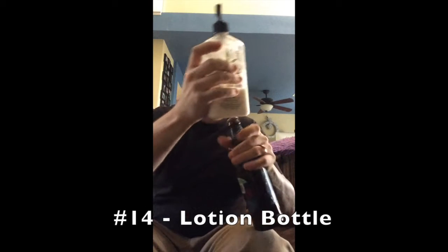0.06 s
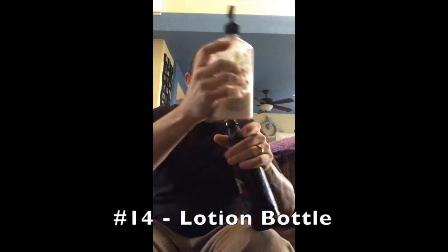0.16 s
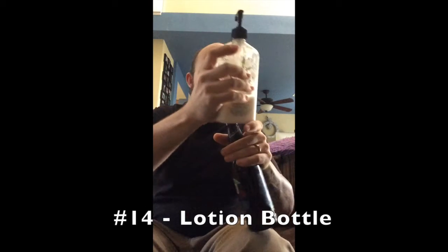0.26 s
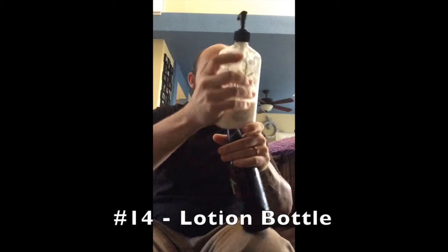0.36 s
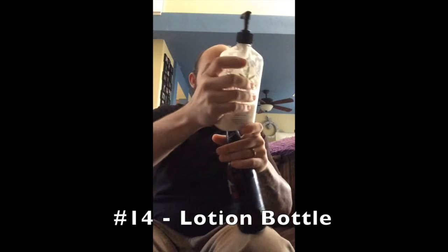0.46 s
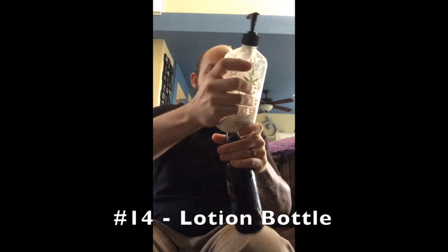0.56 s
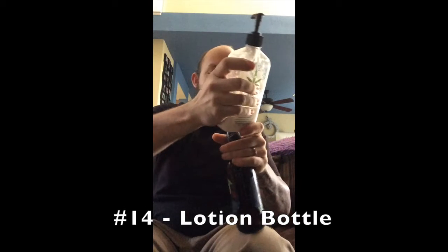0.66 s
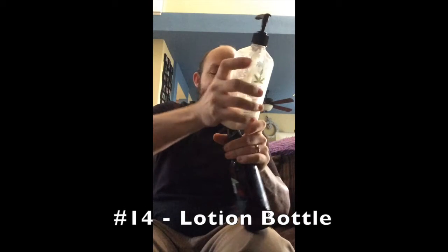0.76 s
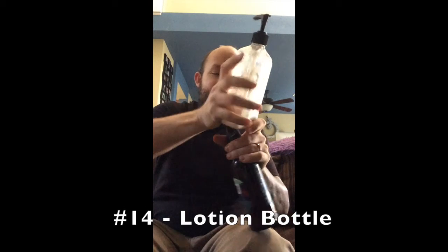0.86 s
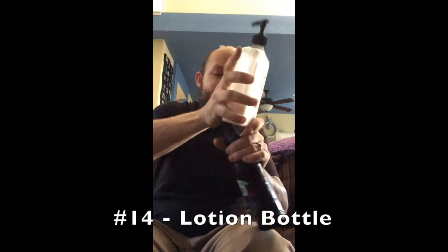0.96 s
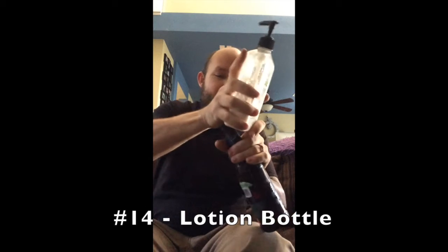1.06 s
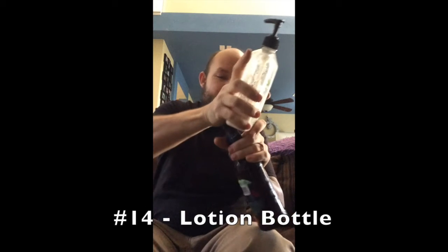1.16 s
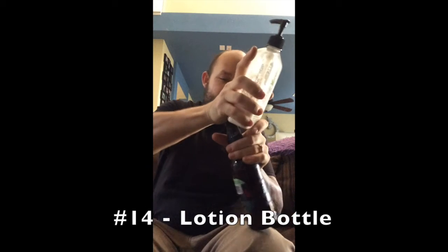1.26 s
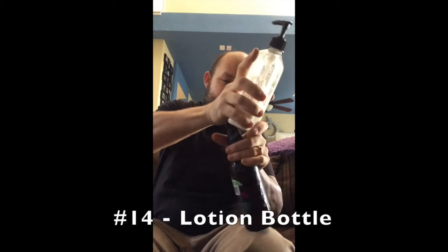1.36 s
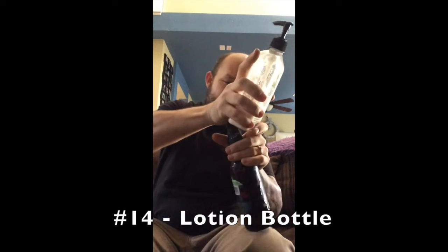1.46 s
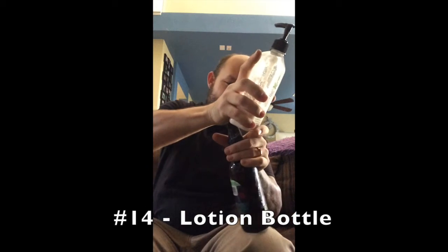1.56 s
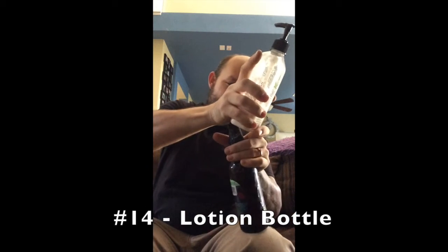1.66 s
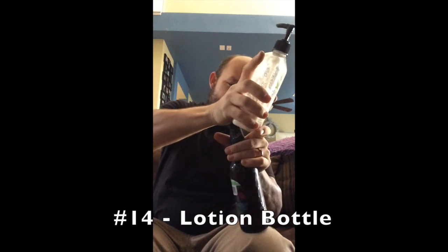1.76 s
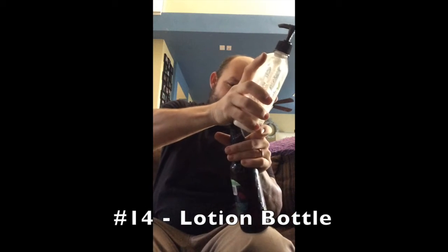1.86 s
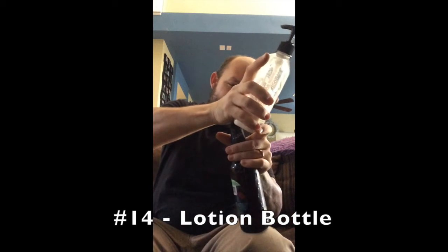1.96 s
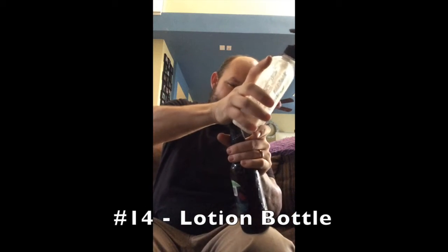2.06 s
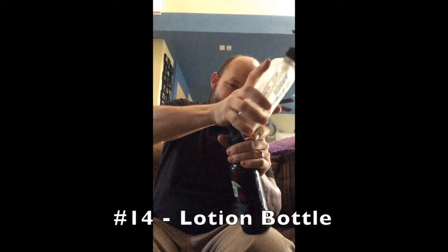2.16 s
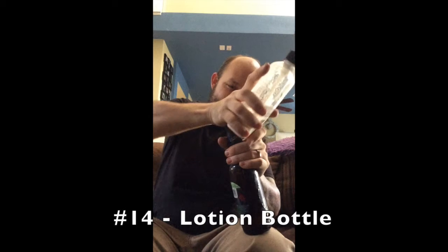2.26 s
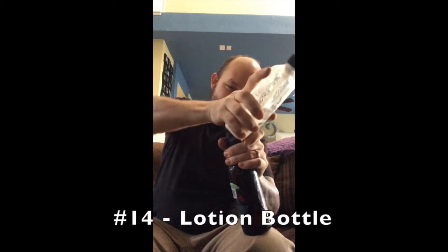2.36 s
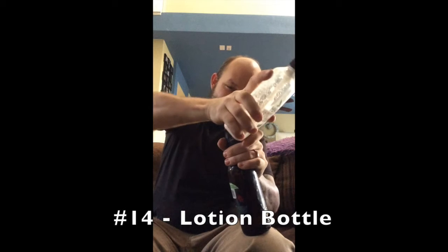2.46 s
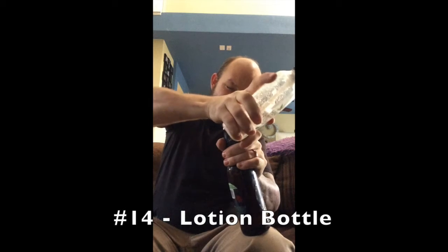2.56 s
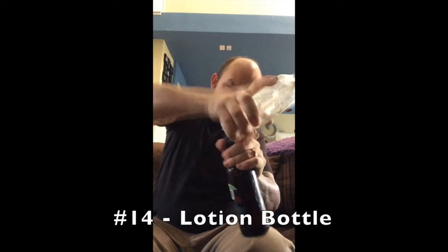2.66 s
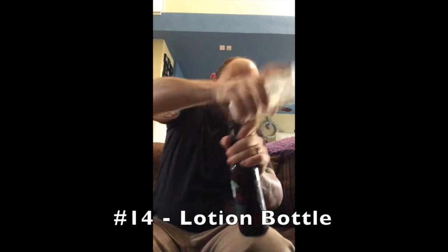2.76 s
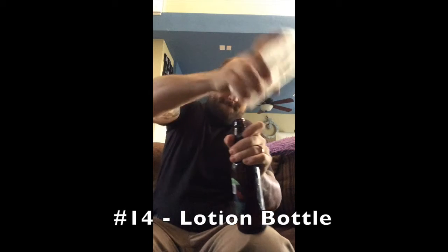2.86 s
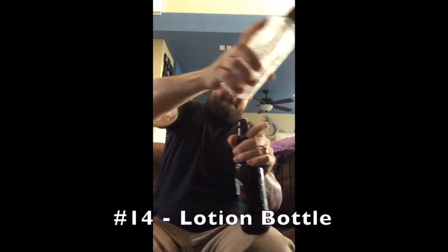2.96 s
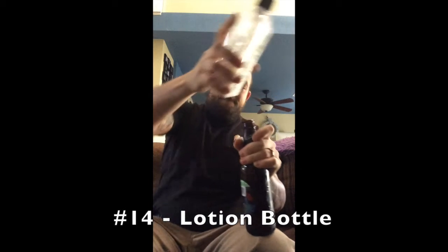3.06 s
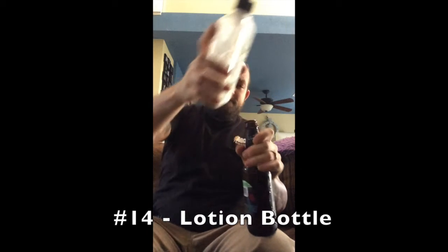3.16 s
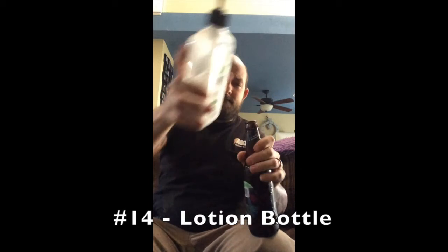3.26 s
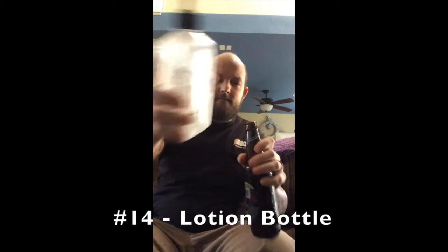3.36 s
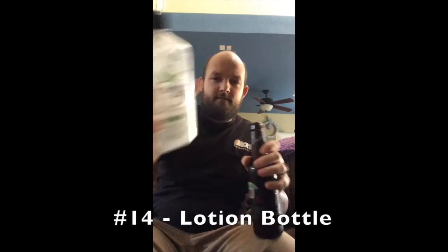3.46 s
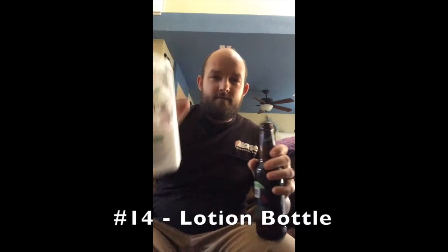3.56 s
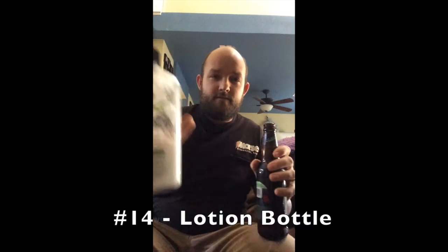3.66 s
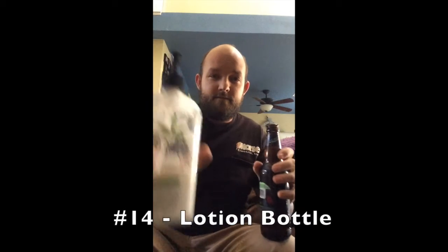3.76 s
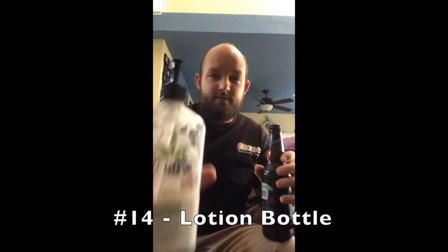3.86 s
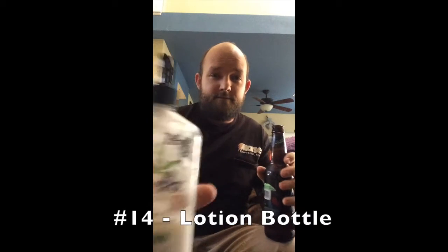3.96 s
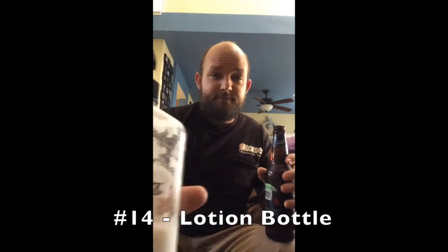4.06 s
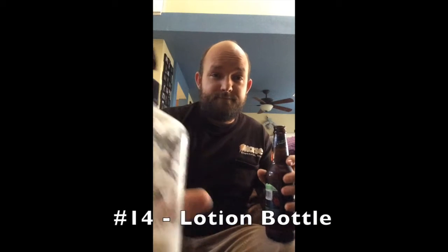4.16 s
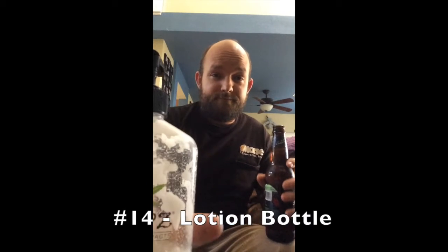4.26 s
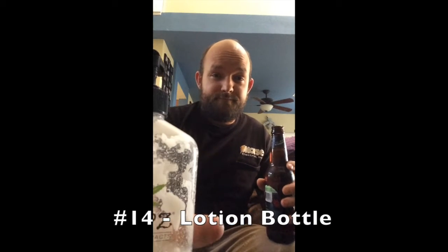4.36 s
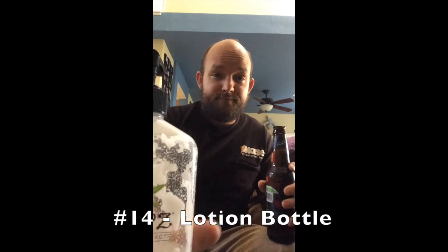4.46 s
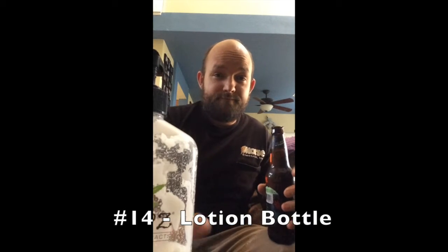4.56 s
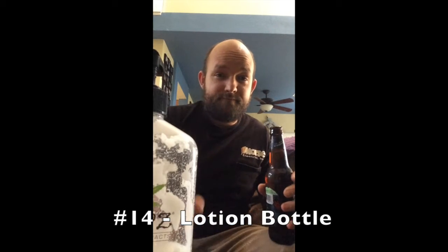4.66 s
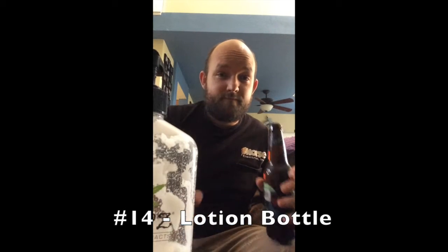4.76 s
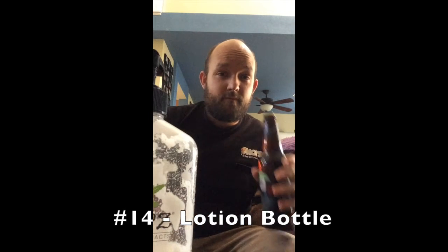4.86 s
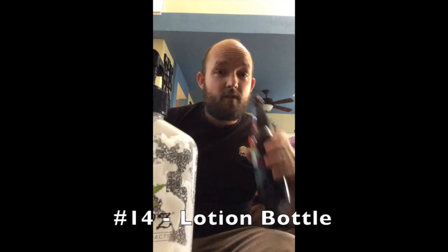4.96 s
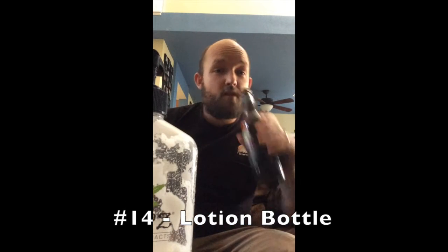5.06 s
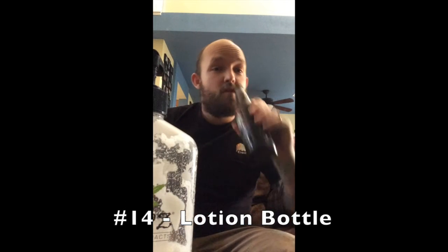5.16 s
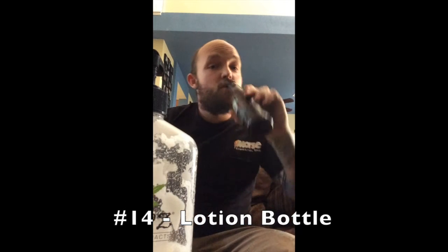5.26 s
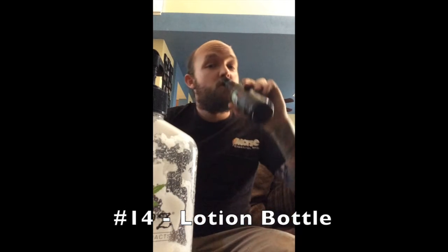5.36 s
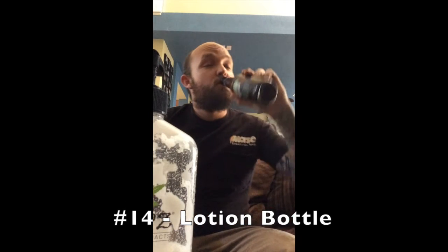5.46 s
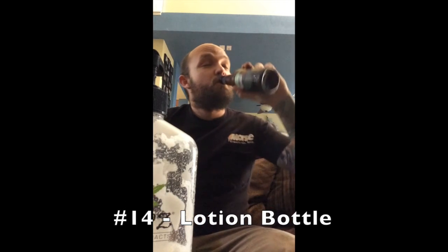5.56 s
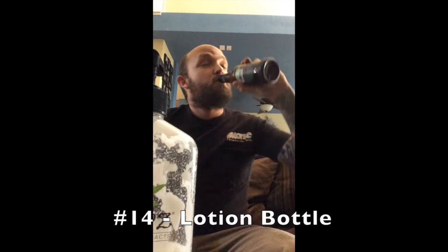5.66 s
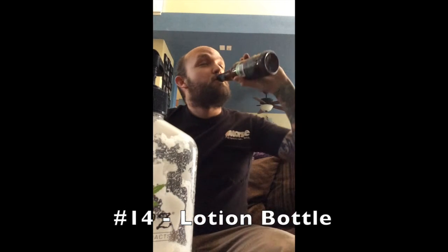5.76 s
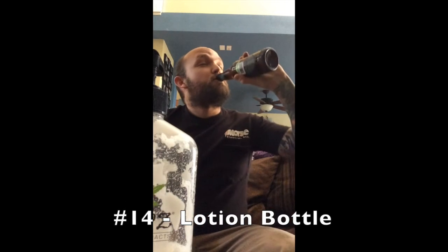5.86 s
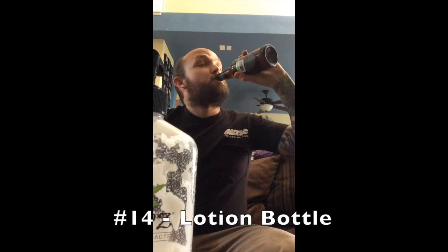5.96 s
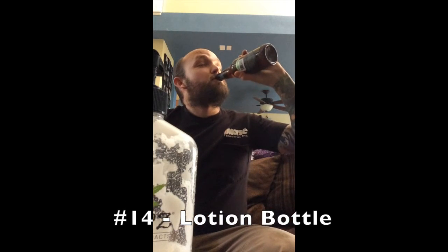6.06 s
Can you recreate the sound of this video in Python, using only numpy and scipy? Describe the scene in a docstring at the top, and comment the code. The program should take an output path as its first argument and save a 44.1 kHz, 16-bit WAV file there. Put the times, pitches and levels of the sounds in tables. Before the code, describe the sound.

In a quiet living room, plastic clacks against a glass bottle, gas spits, the cap snaps off with a hollow ring, and a plastic bottle thuds down.

```python
"""A hard clack, a short hiss of gas, a snap and a ringing neck tone, then a knock, over rustle and room air.
A crown cap is levered off a glass beer bottle with the edge of a plastic lotion bottle in a quiet living
room; the lotion bottle is then knocked down on a table while hands and shirt rustle, with small ticks.
Solid bodies are sums of damped modes, their contacts scattered impulses; gas, friction and air are
filtered noise. Reflections and a diffuse tail place every source but the rubbing and the air in the room."""
import sys
import numpy as np
from scipy import signal
from scipy.fft import rfft, irfft, next_fast_len
from scipy.io import wavfile

SR = 44100
rng = np.random.default_rng(int(sys.argv[2]) if len(sys.argv) > 2 else 0)


def log_audio(samples):
    """Write samples as a 16-bit WAV file to the path given in sys.argv[1]."""
    # one column per channel
    frames = np.atleast_2d(samples).T
    # limit to full scale, then quantise
    limited = np.clip(frames, -1, 1)
    pcm = np.round(limited * 32767).astype(np.int16)
    wavfile.write(sys.argv[1], SR, pcm)


N = 270091  # length in samples

POP_S = 2.7056  # the cap comes free
# air in the opened bottle: pitch_hz, level_db, t60_s
NECK_MODES = [(830, -6.2, .082)]


def amp(db):
    """Gain is ten to the power of a twentieth of the level in dB."""
    return 10 ** (np.asarray(db) / 20)


def unit(x):
    """Normalisation: x scaled to rms 1."""
    return x / np.sqrt(np.mean(x ** 2) + 1e-20)


def along(points, hz):
    """Interpolation of (Hz, value) points on a logarithmic frequency axis."""
    f, v = np.transpose(points)
    return np.interp(np.log(hz + 1), np.log(f + 1), v)


def filtered(x, response):
    """Linear filtering: the spectrum of x times a response of frequency."""
    m = next_fast_len(len(x) + SR // 2)
    spectrum = rfft(x, m) * response(np.fft.rfftfreq(m, 1 / SR))
    return irfft(spectrum, m)[:len(x)]


def resonance(f, hz, width):
    """Response of one damped resonator: unity at its natural frequency, falling off to both sides."""
    return 1j * f * width / (hz * hz - f * f + 1j * f * width)


def causal(gain):
    """Minimum phase: the response with this gain that answers as promptly as physics allows."""
    cepstrum = irfft(np.log(abs(gain) + 1e-6))
    half = len(cepstrum) // 2
    folded = np.r_[cepstrum[0], 2 * cepstrum[1:half]]
    return np.exp(rfft(folded, len(cepstrum)))


def noise(response, size=N):
    """Coloured noise: white noise through a filter, at rms 1."""
    return unit(filtered(rng.standard_normal(size), response))


def fade(t60, attack):
    """Exponential damping over one second: 60 dB in t60, after a rise of time constant attack."""
    t = np.arange(SR) / SR
    return np.exp(-np.log(1000) * t / t60) * (1 - np.exp(-t / attack))


def ring(modes, attack, blur=0):
    """Modal vibration: damped modes set off together; blur (radians) is a tumbling body's phase flutter."""
    t = np.arange(SR) / SR

    def flutter():
        if not blur:
            return 0
        return blur * (1 - np.exp(-t / .02)) * noise(lambda f: f < 45, size=SR)

    return sum(amp(db) * np.sin(2 * np.pi * hz * t + flutter()) * fade(t60, attack)
               for hz, db, t60 in modes)


def burst(response, decay_s):
    """Rough contact: a coloured impulse scattered in time; decay_s sets both its energy and its spread."""
    decay = fade(decay_s, attack=.0001)
    phase = np.angle(rfft(rng.standard_normal(SR) * decay, 2 * SR))
    # flat spectrum with random phase, faded by 15 dB in decay_s
    scatter = irfft(np.exp(1j * phase))[:SR] * decay ** .25
    colour = causal(response(np.fft.rfftfreq(2 * SR, 1 / SR)))
    x = irfft(rfft(scatter, 2 * SR) * colour)[:SR]
    return x * np.linalg.norm(decay) / np.linalg.norm(x)


def at(s, x):
    """Time shift: x placed at s seconds."""
    return np.pad(x, (round(s * SR), N))[:N]


def room(x, wet_db, wall_db, build=0.0062, wall_s=.0275):
    """Reverberation: direct sound, one wall's reflection, and a diffuse tail that builds up and dies by band."""
    # decay of the room: band_hz, t60_s
    band_decay = [(100, 0.36), (400, 0.39), (1000, .36), (4000, .38), (8000, .35), (15000, 0.27)]
    hz, t, z = signal.stft(rng.standard_normal(SR), SR, nperseg=256)
    damping = np.exp(-np.log(1000) * t / along(band_decay, hz)[:, None])
    tail = signal.istft(z * damping, SR, nperseg=256)[1]
    tail = tail * (1 - np.exp(-np.arange(len(tail)) / SR / build))
    diffuse = signal.fftconvolve(x, tail / np.linalg.norm(tail))[:N]
    return x + amp(wall_db) * at(wall_s, x) + amp(wet_db) * diffuse


def background():
    """Broadband and narrow-band noise: steady room air and a narrow, wavering ventilation drone."""
    # room air spectrum, relative per Hz: freq_hz, level_db
    air_spectrum = [(15, -48.5), (25, -28), (42, -14.5), (66, -6.5), (110, -12), (190, -8.5), (300, -12.5),
                    (550, -16), (1020, -25), (1450, -22), (2220, -30.5), (4500, -40.5), (7000, -47),
                    (15400, -58)]
    # drone bands, each resonator applied twice: centre_hz, resonator_width_hz, level_db
    drone_bands = [(179.5, 8.5, -66), (263.5, 50, -70.5)]
    drone = sum(amp(db) * noise(lambda f: resonance(f, hz, width) ** 2) for hz, width, db in drone_bands)
    return amp(-61.5) * noise(lambda f: amp(along(air_spectrum, f))) + drone


def stroke(start, length):
    """Hand kinematics: speed over half a sine as the hand sets off, glides and stops, 0-1."""
    return np.sin(np.pi * np.clip((np.arange(N) / SR - start) / length, 0, 1))


def handling():
    """Granular friction: skin and cloth rub louder as the hand moves faster; grip and arm bump dully."""
    # hands sliding on the bottles, shirt moving: start_s, length_s, level_db
    slides = [(0.082, 0.1, -72), (0.717, .11, -68), (0.804, .25, -66), (1.36, .08, -78), (2.076, 0.14, -70),
              (3.278, 0.36, -77.5), (3.66, 0.33, -75.5), (4.435, 0.13, -72.5), (4.619, 0.2, -71.5),
              (4.779, 0.36, -72.5)]
    # rubbing spectrum, relative per Hz: freq_hz, level_db
    cloth_spectrum = [(300, -9), (1000, 3), (2500, 2.5), (4500, -3.5), (7500, 1), (10000, -5),
                      (15000, -6.5)]
    # soft bumps of the grip and of the arm: start_s, level_db, relative_skin_noise_db
    soft_bumps = [(.459, -49, -17), (0.989, -47.5, -8), (3.48, -45.5, -27)]
    rub_power = 0.91  # loudness against hand speed
    grip_db, grip_end_s = -84, 5.15  # faint rubbing while the hands work

    grain = unit(amp(2 * noise(lambda f: f < 250)))
    grip = amp(grip_db) * (np.arange(N) / SR < grip_end_s)
    sliding = sum(amp(db) * stroke(s, length) ** rub_power for s, length, db in slides)
    friction = np.hypot(grip, sliding)
    rub = friction * grain * noise(lambda f: amp(along(cloth_spectrum, f)))

    thump = lambda: burst(lambda f: resonance(f, 128, 103) ** 2, decay_s=0.075)
    skin = lambda: burst(lambda f: resonance(f, 810, 1000), decay_s=0.1)
    bumps = sum(at(s, amp(db) * (thump() + amp(skin_db) * skin())) for s, db, skin_db in soft_bumps)
    return rub + bumps


def ticks():
    """Impact of small hard bodies: a click and one short ring; the higher the ring, the sooner it dies."""
    # cap, fingers and glass: start_s, level_db, ring_hz, relative_click_db
    taps = [(0.1188, -41, 9060, 0.5), (1.058, -59.5, 5770, 4.5), (1.094, -58, 8540, 4.5),
            (2.2906, -61, 3300, 9), (2.4417, -62, 13000, 2), (3.0201, -47, 9000, 4),
            (3.2686, -44.5, 3440, -10.5), (3.29, -56, 1720, -5), (3.3882, -58, 2140, 7),
            (4.17, -61, 2424, -1), (4.978, -43, 6300, 1), (5.0864, -65, 4060, 6)]
    ring_cycles = 83  # the ring decays by 60 dB in this many cycles
    click = lambda hz: burst(lambda f: resonance(f, hz, 7400) ** 2, decay_s=0.0078)

    def tap(hz, click_db):
        tone = ring([(hz, 0, ring_cycles / hz)], attack=0.00013)
        return tone + amp(click_db) * click(hz)

    train = sum(at(s, amp(db) * tap(hz, click_db)) for s, db, hz, click_db in taps)
    return room(train, wet_db=-14.5, wall_db=-23)


def clacks():
    """Impact excitation of damped modes: the plastic edge grazes the rim, then seats under the cap."""
    # plastic edge meeting the glass neck: start_s, level_db
    strikes = [(.2388, -20.5), (.3425, -46.5), (0.456, -49.5)]
    # the two bottles pressed together, damped by the hands: pitch_hz, relative_level_db, t60_s
    bottle_modes = [(171, -18.5, 0.15), (451, -6, 0.07), (490, -12.5, 0.047), (1940, -18, 0.056),
                    (3286, -15, 0.046), (3500, -41, 0.19), (3600, -28, 0.038), (3540, -42.5, 0.5),
                    (6730, -32, .02), (6780, -31, .016)]
    # the plastic's knock, relative per Hz: freq_hz, level_db
    edge_spectrum = [(100, -10), (300, -28), (480, 7.5), (640, 0.5), (900, 0.5), (1200, -14), (1450, -7.5),
                     (1900, -4.5), (2900, -25), (4200, -23), (5500, -47), (7000, -39), (15000, -47)]
    contact = lambda: amp(5.5) * burst(lambda f: amp(along(edge_spectrum, f)), decay_s=0.0078)
    body = lambda: ring(bottle_modes, attack=.0006, blur=1.1)
    blows = sum(at(s, amp(db) * (body() + contact())) for s, db in strikes)
    scrape = burst(lambda f: resonance(f, 1800, 2300) ** 2, decay_s=0.15)
    graze = at(.2315, amp(-53) * scrape)
    return room(blows + graze, wet_db=-17.5, wall_db=-26)


def hiss():
    """Turbulent jet noise: gas escapes under the lifted rim; a wider slit adds the low part."""
    # jet spectrum before the slit, relative per Hz: freq_hz, level_db
    gas_spectrum = [(350, -58.5), (600, -26), (787, -15.5), (854, -14), (1800, -4.5), (2150, -4.5),
                    (2570, -17.5), (3410, -4.5), (4420, -9.5), (7710, -3), (8950, -11.5), (10100, -2.5),
                    (11000, -5.5), (13600, -1.5), (15400, -7.5)]
    # resonances of the gap, each resonator applied twice: pitch_hz, resonator_width_hz, gain_db
    gap_modes = [(1830, 1200, -5.5), (7600, 1200, 0), (9920, 520, -3), (13700, 850, -4)]
    leak_s, leak_db = 2.512, -35.5
    open_s, hold_s, close_s = .065, 0.028, .034  # the slit opens, stays open, closes as pressure drops
    flow_power = 1.2  # flow grows faster than the width of the slit

    def slit(f):
        return amp(1.0) + sum(amp(db) * abs(resonance(f, hz, width)) ** 2 for hz, width, db in gap_modes)

    jet = noise(lambda f: amp(along(gas_spectrum, f)) * slit(f))
    low = filtered(jet, lambda f: 1 / (1 + (f / 3500) ** 2) ** 2)
    corners_s = np.cumsum([leak_s, open_s, hold_s, close_s])
    slit_width = np.interp(np.arange(N) / SR, corners_s, [0, 1, 1, 0])
    flow = slit_width ** flow_power
    gas = amp(leak_db) * flow * (jet - (1 - np.sqrt(flow)) * low)
    return room(gas, wet_db=-18.5, wall_db=-32.0)


def echoes(count):
    """Repeated reflection: the neck tone lingers and swells back on each round trip between two walls."""
    trip_s, echo_db, trip_loss_db = .11, -30.5, 13  # each round trip is weaker by the loss
    echo_rise_s, echo_t60_s = 0.0043, 0.16
    linger_db, linger_t60_s = -42, .68  # the same tone, diffuse in the room
    swell = at(POP_S, amp(linger_db) * fade(linger_t60_s, attack=.02))
    for k in range(count):
        echo = amp(echo_db - k * trip_loss_db) * fade(echo_t60_s, echo_rise_s)
        swell = swell + at(POP_S + (k + 1) * trip_s, echo)
    wander = 0.5 * noise(lambda f: f < 40)  # radians
    return swell * np.sin(2 * np.pi * NECK_MODES[0][0] * np.arange(N) / SR + wander)


def pop():
    """Sudden release: the crimps let go, the cap rings and tumbles, and the pressure sounds the neck."""
    # crimps scraping and snapping over the glass lip: start_s, level_db, decay_s (as in burst)
    crimp_snaps = [(2.6925, -47.5, 0.24), (2.7028, -29, 0.03), (2.705, -13.5, 0.02),
                   (2.7069, -12.5, 0.0074)]
    # colour of a snap, relative per Hz: freq_hz, level_db
    snap_spectrum = [(40, -26), (90, 2), (200, -5), (560, -2.5), (830, -4), (1200, 3.5), (1800, -1),
                     (2700, -10), (3800, -6.5), (4400, -14), (5200, -8), (7700, -9.5), (15000, -21.5)]
    # glass body and held plastic, jolted by the release: pitch_hz, level_db, t60_s
    jolt_modes = [(80, -29, 0.035), (128, -35, 0.056), (258, -28, 0.057), (308, -30.5, 0.053),
                  (430, -23, 0.018), (570, -14, .018), (576, -27, 0.066), (1150, -27.5, .025),
                  (1294, -28, .03), (1666, -35, 0.13)]
    # the steel cap as it flies off: pitch_hz, level_db, t60_s
    cap_modes = [(3460, -22, .028), (3470, -50, .52), (3600, -52, .45), (3820, -31, .02), (5088, -18, .019),
                 (5110, -46, .42), (5245, -17, .021), (5290, -46, .42), (6540, -55, .25), (7845, -29, .02),
                 (7856, -58, .3)]

    snaps = sum(at(s, amp(db) * burst(lambda f: amp(along(snap_spectrum, f)), decay_s))
                for s, db, decay_s in crimp_snaps)
    jolt = at(POP_S, ring(jolt_modes, attack=0.0013))
    steel = at(POP_S, ring(cap_modes, attack=.0008, blur=2))
    # the air column starts once the mouth is open
    air = at(POP_S + .0011, ring(NECK_MODES, attack=.002))
    return (room(snaps, wet_db=-15, wall_db=-20.0)
            + room(jolt, wet_db=-7, wall_db=-14.5)
            + room(steel, wet_db=-15.0, wall_db=-14.0)
            + room(air, wet_db=-21.5, wall_db=-31.0)
            + echoes(count=4))


def knock():
    """Impact on a plate: the lotion bottle lands on its rim, then flat, and the table top's modes boom."""
    # rim, then flat of the base, touching down and rocking:
    # start_s, level_db, decay_s (as in burst), dulling_hz
    landings = [(4.268, -38, 0.058, 150.4), (4.2747, -25, 0.011, 8980), (4.2777, -8.5, 0.0074, 2310),
                (4.289, -31.5, 0.036, 1300), (4.3145, -29, 0.062, 497), (4.329, -31, 0.056, 350)]
    # colour of a contact before dulling, relative per Hz: freq_hz, level_db
    thud_spectrum = [(50, -13), (110, 3), (200, -3.5), (500, 10.5), (850, -3.5), (1300, 2), (2000, 1.5),
                     (3000, -11), (5000, -11.5), (9000, -17), (13800, -17), (15000, -27)]
    # table top under the lotion bottle: pitch_hz, level_db, t60_s
    table_modes = [(78.9, -18, 0.025), (133.8, -22, 0.3), (160, -34, 0.16), (262, -32, 0.34),
                   (293.7, -29.5, 0.27), (339, -19, 0.17), (397.7, -12.5, 0.048), (447, -13.5, .03),
                   (481.2, -3, 0.033), (567, -29, 0.12), (616.6, -36, 0.27), (751, -35.5, 0.21),
                   (1008, -35, 0.12), (1037, -43, 0.38), (1711, -45, 0.23), (2230, -42.5, .18)]
    knock_s = 4.2762  # the table top starts to sound

    def base(dull_hz):
        return lambda f: amp(along(thud_spectrum, f)) / np.hypot(1, f / dull_hz)

    contacts = sum(at(s, amp(db) * burst(base(dull_hz), decay_s)) for s, db, decay_s, dull_hz in landings)
    boom = at(knock_s, ring(table_modes, attack=0.0018))
    return room(contacts, wet_db=-9.5, wall_db=-23, build=0.0018) + room(boom, wet_db=-25.5, wall_db=-14.5)


def scene():
    """Superposition: all sources add at one microphone."""
    return (background() + handling() + ticks() + clacks() + hiss() + pop() + knock())[None]


def record(dry):
    """Band limiting: the microphone sheds the deepest bass and cuts steeply above its band limit."""
    top_hz = 15350
    bass = lambda f: -f * f / (42 ** 2 - f * f + 55j * f)
    treble = lambda f: 1 / np.sqrt(1 + (f / top_hz) ** 200)
    return np.array([filtered(x, lambda f: bass(f) * treble(f)) for x in dry])


dry = scene()
out = record(dry)
log_audio(out)
```